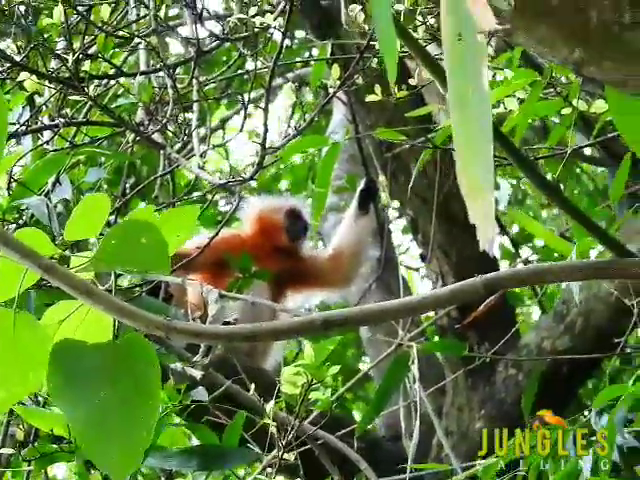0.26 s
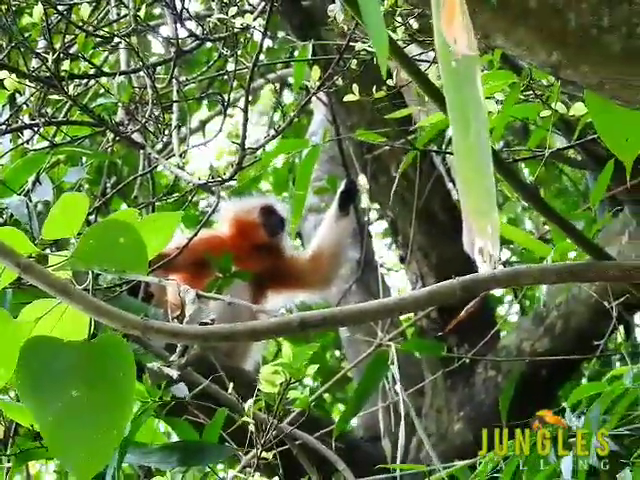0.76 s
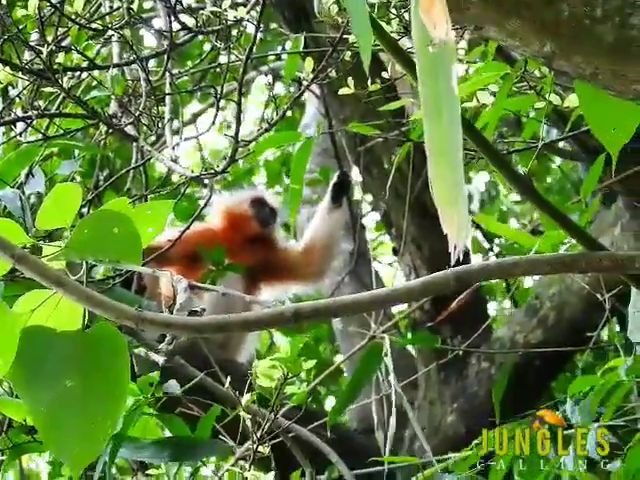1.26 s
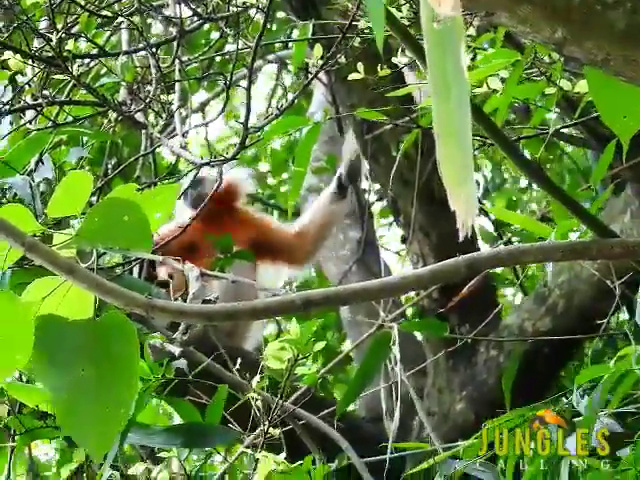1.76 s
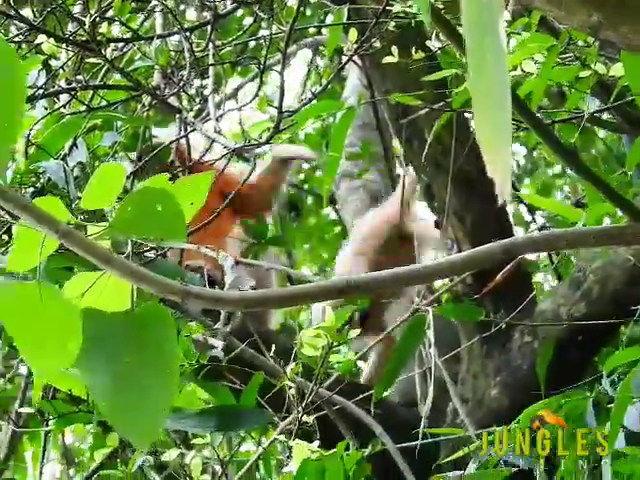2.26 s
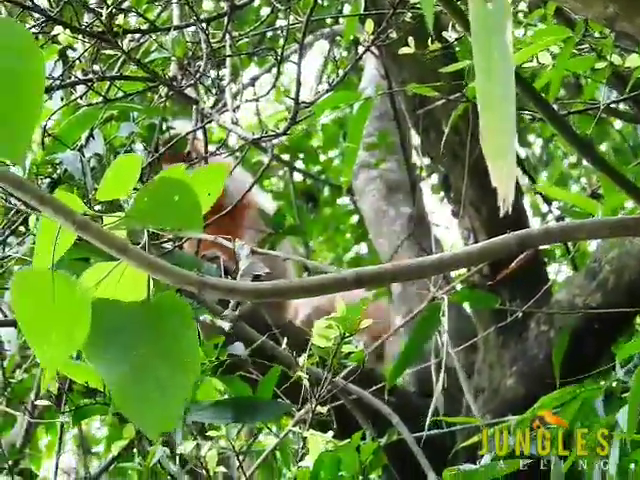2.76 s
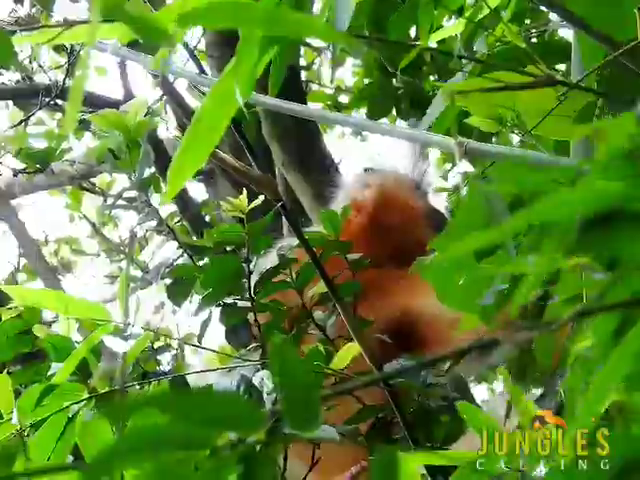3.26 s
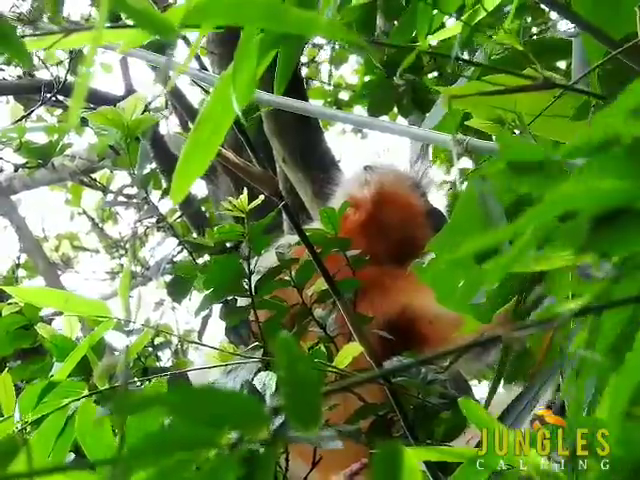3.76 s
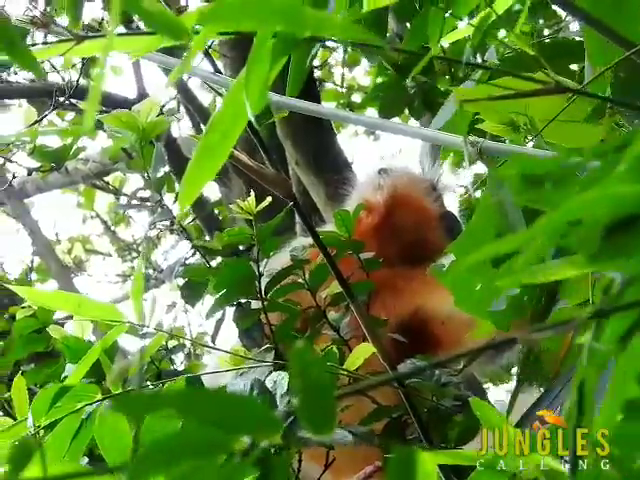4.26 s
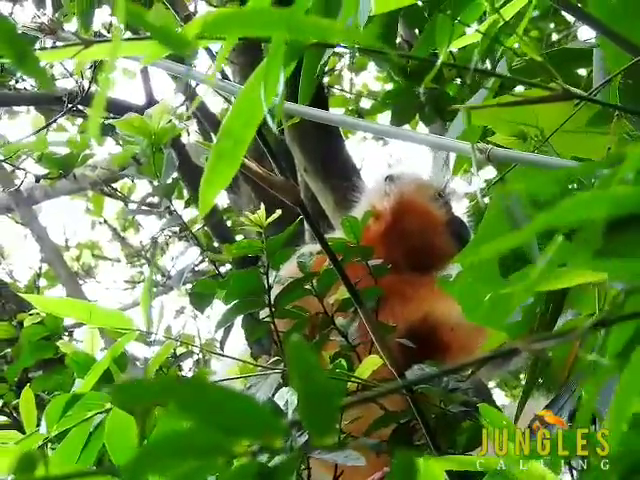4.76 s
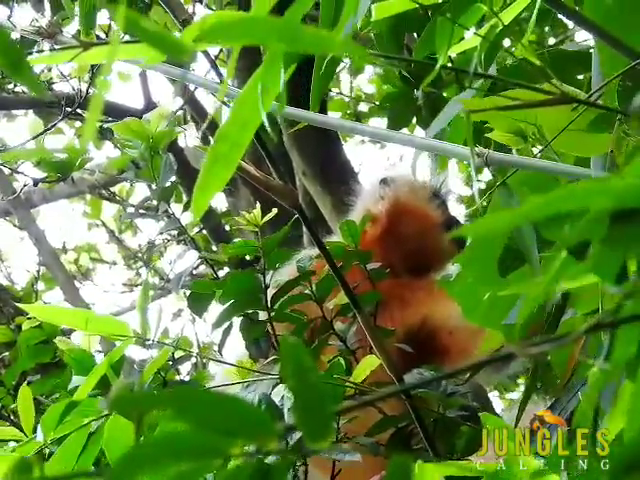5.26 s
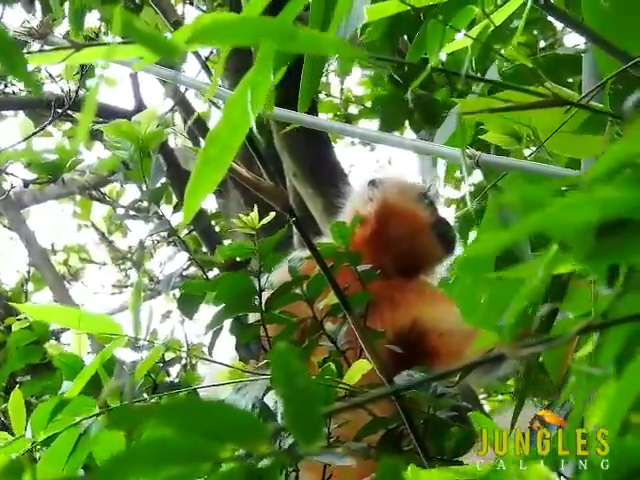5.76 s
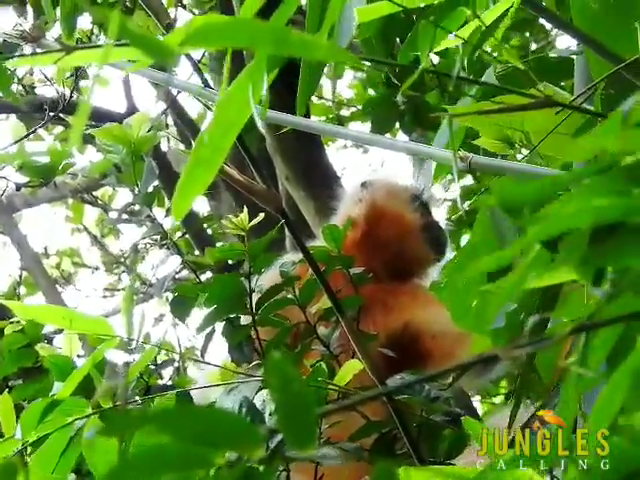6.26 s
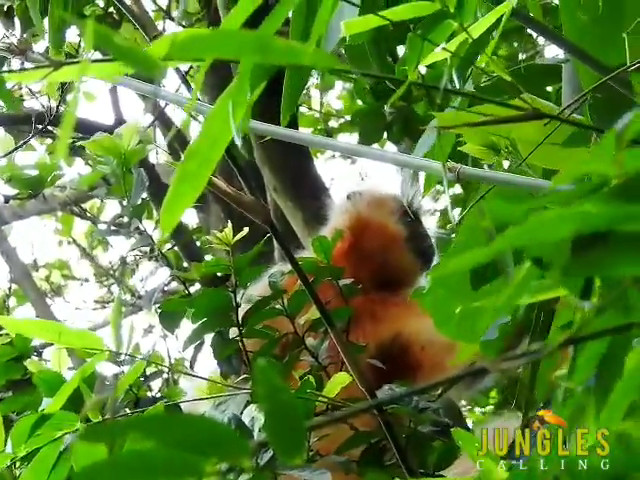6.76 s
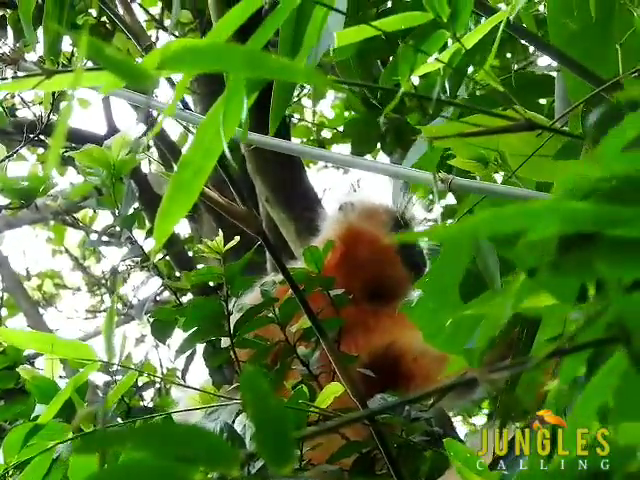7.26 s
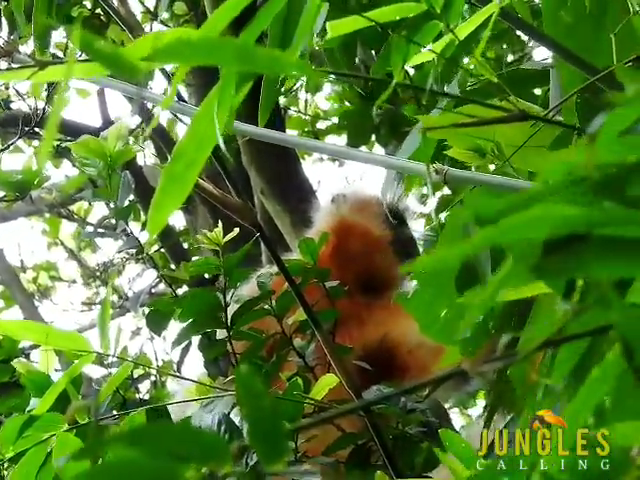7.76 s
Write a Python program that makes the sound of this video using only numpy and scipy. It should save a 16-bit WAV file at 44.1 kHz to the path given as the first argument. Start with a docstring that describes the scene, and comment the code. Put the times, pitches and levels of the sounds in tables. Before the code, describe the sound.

A bird hoots one short, pure, low note twice a second over a steady insect drone, with scattered chirps and three nasal mews in a forest.

```python
"""A forest by day at one microphone. From the start, shaped noise gives the low rush, and pulsing narrow
bands of noise give a chorus of insects near 5 kHz. Gliding sines soon whistle and chip from the foliage,
and repeated down-slurs trill far off. A barbet-like bird then hoots twice a second, a nearly pure tone
which the trees throw back. A nearer bird gives three nasal, arching mews, harmonics through throat
resonances, the first with a rasping echo of down-slurs; late on, a mellow sine whistle slurs down."""
import sys
import numpy as np
from scipy import signal
from scipy.fft import rfft, irfft
from scipy.io import wavfile
from scipy.ndimage import uniform_filter1d

SR = 44100
rng = np.random.default_rng(int(sys.argv[2]) if len(sys.argv) > 2 else 0)


def put_to_file(sound):
    """Save the sound as 16-bit audio at rate SR, in the file named by the first command-line argument."""
    columns = np.atleast_2d(sound).T  # one column per channel
    safe = np.clip(columns, -1, 1)
    whole_steps = np.round(safe * 32767)
    wavfile.write(sys.argv[1], SR, whole_steps.astype(np.int16))


N = 353682
TIME = np.arange(N) / SR
TOP_HZ = 9950  # upper limit of the recorder

# low rush of the forest and faint hiss of leaves, relative spectrum: frequency_hz, gain_db
RUSH_SPECTRUM = [(20, -6.5), (65, 1), (130, -1), (280, -0.5), (450, -4), (700, -7), (1000, -10.5),
                 (2000, -15), (3500, -17.5), (4700, -24.5), (5500, -32.5), (6000, -35), (6400, -23.5),
                 (9800, -32.5)]
RUSH_DB = -38.5

# insect choruses: centre_hz, width_hz, level_db, pulse_rate_hz, pulse_depth (0-1)
INSECT_BANDS = [(4874, 536, -44, 32, 0.2), (4516, 550, -49, 55, 0.13), (6590, 2200, -61.5, 48, 0.49),
                (8470, 1860, -58, 120, 0.14), (9760, 40, -72, 30, .1)]
# course of the whole insect chorus: time_s, gain_db
INSECT_LEVEL = [(0, 1), (1.2, -1.5), (2.5, 1), (5.1, -.5), (5.8, 1.1), (6.5, -0.1), (8, -1)]

# piping notes: start_s, length_s, pitch_hz, level_db, arch (share of the pitch)
PIPS = [(0.057, 0.052, 5880, -46, 0), (.266, .049, 5870, -49, 0.013), (2.452, 0.048, 5250, -36, 0),
        (3.628, 0.044, 3130, -41.5, 0.01), (3.664, 0.046, 2904, -33, 0), (3.804, .1, 3080, -41, .25)]
PIP_FALL, PIP_SCATTER = .025, 0.13  # share of the pitch lost from start to end; share scattered by leaves
# soft upward slurs of birds further off: start_s, length_s, start_hz, level_db
SLURS = [(0.166, 0.031, 3220, -40), (.363, 0.028, 3070, -39), (1.595, .025, 1480, -41),
         (3.088, 0.066, 2390, -47.5), (3.563, 0.063, 2060, -43), (4.515, 0.023, 1503, -39.5),
         (4.543, 0.048, 5000, -36.5), (5.657, 0.04, 1324, -42), (6.62, 0.034, 1734, -40.5)]
SLUR_OCTAVES_PER_S, SLUR_SCATTER = 4.4, 0.45
# one high, thin call in three fading arches: start_s, level_db
SEETS = [(1.898, -30.5), (1.935, -34), (1.985, -41)]
SEET_S, SEET_HZ, SEET_SCATTER = 0.0457, (6400, 7120, 6980), 0.8  # start, middle and end pitch
# harsh chips, two voices sweeping up at once: start_s, level_db
CHIPS = [(2.082, -32.5), (2.786, -32.5)]
# the two voices of a chip: start_hz, end_hz, gain_db
CHIP_VOICES = [(2090, 4400, -1), (5150, 7500, -6.5)]
CHIP_S, CHIP_SCATTER = 0.033, 1
# thin rising whips of one songbird: start_s, level_db
WHIPS = [(2.425, -41), (2.548, -40.5), (2.682, -37.5), (2.905, -38.5), (3.05, -43.5), (3.195, -42),
         (3.465, -44)]
WHIP_S, WHIP_HZ, WHIP_SCATTER = 0.042, (3050, 4100, 4560), .55
# sharp falling ticks: start_s, start_hz, level_db
TICKS = [(2.477, 7290, -34.5), (6.152, 8780, -31.5), (6.17, 7300, -37)]
TICK_S, TICK_FALL, TICK_SCATTER = .029, .2, 1  # TICK_FALL is the share of the pitch lost
# nasal rising whines, a tone and its octave: start_s, level_db, octave_gain_db
WHINES = [(4.625, -39.5, -5.5), (5.195, -42, -0.5)]
WHINE_S, WHINE_HZ, WHINE_SCATTER = .145, (1573, 1862, 2643), 0.5

# trills and chatter far off, and the rasping echo that follows the first mew near 2.7 kHz:
# start_s, length_s, start_hz, end_hz, level_db
TRILLS_AND_MEW_ECHO = [(.173, .29, 2448, 3130, -44.5), (.93, .66, 7940, 7530, -51),
                       (1.789, .22, 2763, 2740, -36), (2.829, 0.72, 5210, 5360, -43.5),
                       (4.152, 0.7, 7960, 7340, -48), (4.308, .17, 6400, 5950, -47),
                       (4.6, .38, 6530, 5830, -44), (5.19, 0.26, 5630, 5980, -45)]
TRILL_SWEEP = .12  # half the sweep of a slur, as a share of the pitch
TRILL_ROUNDNESS = 0.19  # power that shapes the swell and fade of each row

# hoots: start_s, pitch_hz, level_db
HOOTS = [(.345, 665.4, -22), (.858, 672, -17.5), (1.38, 672, -15.5), (1.931, 668.6, -13),
         (2.436, 669, -12.5), (2.921, 668.6, -12.5), (3.406, 665.7, -12), (3.904, 662, -12),
         (4.39, 663, -12), (4.891, 660.6, -11.5), (5.369, 666.3, -12.2), (5.879, 672, -12.5),
         (6.372, 662, -12.5), (6.862, 652.6, -12.5), (7.35, 650.7, -12.5), (7.87, 655, -14)]
# overtones of a full hoot, from the second harmonic up: gain_db
HOOT_OVERTONES_DB = [-34.5, -36, -37.5, -41]
# echoes of the hoot from trunks and slope: delay_s, gain_db
ECHOES = [(.022, -27.5), (.068, -14.5), (.086, -22), (.147, -22.5), (.208, -22.5)]
HOOT_S, HOOT_ROUNDNESS, HOOT_RELEASE_S = 0.067, 0.51, .006  # length; power of the half sine; last fade
HOOT_SAG, HOOT_SAG_S = 0.085, 0.0096  # a full hoot starts sharp by this share and settles in this time
HOOT_RISE_PER_S, HOOT_ON_PITCH_S = 1.48, 0.0261  # steady lift, as shares of the pitch; zero at this time

# mews: start_s, length_s, top_pitch_hz, level_db, crest (place of the top, 0-1)
MEWS = [(1.674, 0.21, 896, -25.5, 0.49), (3.997, .19, 922, -25, 0.45), (7.271, .206, 898, -26, .51)]
# throat and beak resonances of the mewing bird: frequency_hz, gain_db
MEW_THROAT = [(900, -23), (1400, -18), (1800, -11.5), (2250, -5.5), (2650, -3.5), (3150, -14.5), (3600, 0),
              (4000, 0), (4500, -20.5), (5400, -14), (6300, -18), (7200, -16.5), (8900, -27.5),
              (9900, -22.5)]
MEW_ARCH = .17  # share of the top pitch lost half a call away from a central crest
MEW_SCOOP, MEW_SCOOP_S = .17, .055  # the voice scoops up from this much lower still, in this time
MEW_DROOP, MEW_DROOP_S = .13, 0.024  # and droops by this much at the very end
MEW_ATTACK_S, MEW_RELEASE_S, MEW_SWELL_DB = 0.053, 0.023, 1  # the bird presses harder by the swell

# a mellow whistle and its soft afternote: start_s, length_s, pitch_hz, level_db, fall (share of the pitch)
WHISTLES = [(6.084, 0.11, 1575, -23, 0.178), (6.204, 0.072, 1145, -38, .02)]
WHISTLE_HOLD = 0.53  # share of the note before the pitch falls
WHISTLE_ATTACK_S, WHISTLE_RELEASE_S = 0.033, 0.057


def undb(db):
    """The decibel is logarithmic: 20 dB is a tenfold amplitude."""
    return 10 ** (np.asarray(db) / 20)


def unit(x):
    """Root-mean-square normalisation: a signal of rms 1."""
    return x / np.sqrt(np.mean(x ** 2))


def colour(hz, points):
    """Spectral envelope: gain interpolated in dB over logarithmic frequency."""
    point_hz, point_db = np.transpose(points)
    return undb(np.interp(np.log(hz + 1), np.log(point_hz), point_db))


def noise(gain):
    """Spectral shaping: white noise weighted by gain(Hz), then brought to rms 1."""
    hz = np.arange(N // 2 + 1) * SR / N
    spectrum = rfft(rng.standard_normal(N)) * gain(hz)
    return unit(irfft(spectrum, N))


def walk(rate):
    """Slow random modulation: levels held 1 / rate s and smoothed twice; spread near 1."""
    hold = int(SR / rate)
    steps = np.repeat(rng.standard_normal(N // hold + 1), hold)
    smooth = uniform_filter1d(uniform_filter1d(steps, hold), hold)
    return 1.3 * smooth[:N]


def turn(hz):
    """Phase in radians is the running integral of angular frequency."""
    return 2 * np.pi * np.cumsum(hz) / SR


def course(length):
    """Normalised time: 0 to 1 over the length of a note."""
    return np.linspace(0, 1, int(length * SR))


def envelope(length, attack, release):
    """Amplitude envelope: a quarter-sine attack, a hold and a quarter-sine release."""
    t = course(length) * length
    edge = np.minimum(t / attack, (length - t) / release)
    return np.sin(np.pi / 2 * np.clip(edge, 0, 1))


def add(track, s, sound):
    """Linear superposition: mix a sound into a track at time s."""
    i = max(int(s * SR), 0)
    track[i:i + len(sound)] += sound[:max(N - i, 0)]


def foliage(x, t60, build):
    """Diffuse scattering: countless reflections from leaves and trunks build up and die away."""
    t = TIME[:SR]
    decay = undb(-60 * t / t60)
    response = rng.standard_normal(SR) * decay * (1 - np.exp(-t / build))
    return signal.fftconvolve(x, response / np.linalg.norm(response))[:N]


def rush():
    """Broadband noise: distant air in the canopy, strongest in the lows."""
    return undb(RUSH_DB) * noise(lambda f: colour(f, RUSH_SPECTRUM))


def insects(flicker_db=1.0):
    """Shared narrow resonances: many insects ring in them, with pulse trains drifting in and out of step."""
    out = np.zeros(N)
    for centre_hz, width_hz, db, rate, depth in INSECT_BANDS:
        ring = noise(lambda f: (1 + ((f - centre_hz) / width_hz) ** 2) ** -2.5)
        pulse_hz = rate * (1 + 0.13 * walk(12))
        throb = 1 + depth * np.sin(turn(pulse_hz))
        out += ring * throb * undb(db + flicker_db * walk(9))
    return out * undb(np.interp(TIME, *np.transpose(INSECT_LEVEL)))


def songbirds(quiver=0.0064):
    """Frequency glides and scattering: the deeper a bird sits in leaves, the less sound arrives direct."""
    direct, scattered = np.zeros(N), np.zeros(N)
    waver = 1 + quiver * walk(300)

    def sing(s, length, pitches, db, scatter):
        """Polynomial glide: one note passes smoothly through evenly spaced pitches."""
        u, share = course(length), np.clip(scatter, 0, 1)
        places = np.linspace(0, 1, len(pitches))
        glide = np.polyfit(places, pitches, len(pitches) - 1)
        now = int(s * SR) + np.arange(len(u))
        hz = np.polyval(glide, u) * waver[now] ** share
        note = undb(db) * np.sin(turn(hz)) * signal.windows.tukey(len(u), .5)
        # square roots split the power between the two paths
        add(direct, s, note * np.sqrt(1 - share))
        add(scattered, s, note * np.sqrt(share))

    for s, length, hz, db, arch in PIPS:
        bend = np.array([1 - arch + PIP_FALL / 2, 1, 1 - arch - PIP_FALL / 2])
        sing(s, length, hz * bend, db, PIP_SCATTER)
    for s, length, hz, db in SLURS:
        end_hz = hz * 2 ** (SLUR_OCTAVES_PER_S * length)
        sing(s, length, (hz, end_hz), db, SLUR_SCATTER)
    for s, db in SEETS:
        sing(s, SEET_S, SEET_HZ, db, SEET_SCATTER)
    for s, db in CHIPS:
        for start_hz, end_hz, voice_db in CHIP_VOICES:
            sing(s, CHIP_S, (start_hz, end_hz), db + voice_db, CHIP_SCATTER)
    for s, db in WHIPS:
        sing(s, WHIP_S, WHIP_HZ, db, WHIP_SCATTER)
    for s, hz, db in TICKS:
        sing(s, TICK_S, (hz, hz * (1 - TICK_FALL)), db, TICK_SCATTER)
    for s, db, octave_db in WHINES:
        sing(s, WHINE_S, WHINE_HZ, db, WHINE_SCATTER)
        sing(s, WHINE_S, 2 * np.array(WHINE_HZ), db + octave_db, WHINE_SCATTER)
    # nearby leaves blur the note at once; trunks further off add a longer tail
    leaves = foliage(scattered, t60=0.35, build=0.0014)
    trunks = undb(1.5) * foliage(scattered, t60=1.0, build=0.016)
    return direct + leaves + trunks


def trills_and_mew_echo(rate=34, uneven=.2):
    """Periodic frequency sweeps: blurred, uneven down-slurs form far trills and the first mew's rasping echo."""
    out = np.zeros(N)
    for s, length, start_hz, end_hz, db in TRILLS_AND_MEW_ECHO:
        u = course(length)
        slur_rate = rate * (1 + uneven * walk(25)[:len(u)])
        slur = np.cumsum(slur_rate) / SR % 1  # runs 0 to 1 in each slur
        hz = (start_hz + (end_hz - start_hz) * u) * (1 + TRILL_SWEEP * (1 - 2 * slur))
        swell = (np.sin(np.pi * u ** 0.59) ** 2) ** TRILL_ROUNDNESS
        add(out, s, undb(db) * np.sqrt(2) * np.sin(turn(hz)) * np.sin(np.pi * slur) * swell)
    return foliage(out, t60=0.45, build=0.0027)


def hooter(full_db=-12):
    """Near-sinusoidal source: a swollen throat sac; the pitch sags, then lifts, and discrete echoes follow."""
    direct, back = np.zeros(N), np.zeros(N)
    u = course(HOOT_S)
    t = u * HOOT_S
    bend = 1 + HOOT_SAG * np.exp(-t / HOOT_SAG_S) + HOOT_RISE_PER_S * (t - HOOT_ON_PITCH_S)
    last_fade = np.clip((HOOT_S - t) / HOOT_RELEASE_S, 0, 1)
    size = np.abs(np.sin(np.pi * u)) ** HOOT_ROUNDNESS * last_fade
    for s, hz, db in HOOTS:
        effort = undb(db - full_db)  # timid hoots are flatter in pitch and less pure
        phase = turn(hz * bend ** effort)
        overtones = sum(undb(d) * np.sin(k * phase) for k, d in enumerate(HOOT_OVERTONES_DB, 2))
        note = (np.sin(phase) + overtones / effort) * size * undb(db)
        add(direct, s, note)
        for delay, echo_db in ECHOES:
            add(back, s + delay, note * undb(echo_db))
    return direct + back + undb(-21) * foliage(direct, t60=1.0, build=0.13)


def mewer(jitter=0.0054, rasp_db=-22, fray=4, flutter_db=4):
    """Source and filter: harmonics arch through fixed throat resonances; the voice frays towards the end."""
    out = np.zeros(N)
    waver = walk(700)
    rasp = noise(lambda f: colour(f, MEW_THROAT) ** .5)
    # twigs close to the bird make each overtone flutter, the high ones most
    flutter = {k: undb(flutter_db * min(k / 10, 1) * walk(70)) for k in range(1, 15)}
    for s, length, top_hz, db, crest in MEWS:
        u = course(length)
        now = int(s * SR) + np.arange(len(u))
        arch = 1 - MEW_ARCH * (2 * (u - crest)) ** 2
        scoop = MEW_SCOOP * np.maximum(1 - u * length / MEW_SCOOP_S, 0) ** 1.4
        droop = MEW_DROOP * np.maximum(1 - (1 - u) * length / MEW_DROOP_S, 0) ** 1.45
        rough = 1 + fray * np.abs(u) ** 8
        hz = top_hz * (arch - scoop - droop) * (1 + jitter * rough * waver[now])
        phase = turn(hz)
        voice = sum(colour(k * hz, MEW_THROAT) * gain[now] * np.sin(k * phase)
                    for k, gain in flutter.items())
        breath = undb(rasp_db) * rough * rasp[now]
        size = envelope(length, MEW_ATTACK_S, MEW_RELEASE_S) * undb(db + MEW_SWELL_DB * (u - .5))
        add(out, s, (voice + breath) * size)
    return out + undb(-11.5) * foliage(out, t60=0.71, build=.01)


def whistler():
    """Pure tone and glide: the pitch holds, then slurs down as it fades, with a little forest tail."""
    out = np.zeros(N)
    for s, length, hz, db, fall in WHISTLES:
        slur = np.clip((course(length) - WHISTLE_HOLD) / (1 - WHISTLE_HOLD), 0, 1)
        size = envelope(length, WHISTLE_ATTACK_S, WHISTLE_RELEASE_S) ** 1.2
        add(out, s, undb(db) * size * np.sin(turn(hz * (1 - fall * slur))))
    return out + undb(-16) * foliage(out, t60=.5, build=.02)


def scene():
    """Superposition at a point: all voices reach one microphone, so both channels are alike."""
    background = rush() + insects()
    birds = songbirds() + trills_and_mew_echo() + hooter() + mewer() + whistler()
    forest = background + birds
    return np.array([forest, forest])


def record(dry):
    """Band limiting: the recorder cuts the top steeply with an elliptic low-pass."""
    return signal.sosfilt(signal.ellip(10, .2, 70, TOP_HZ, fs=SR, output="sos"), dry)


dry = scene()
out = record(dry)
put_to_file(out)
```